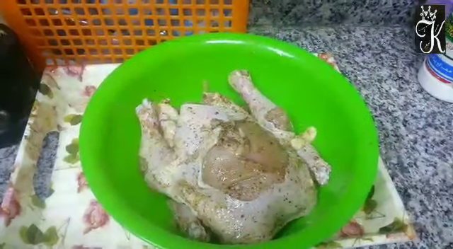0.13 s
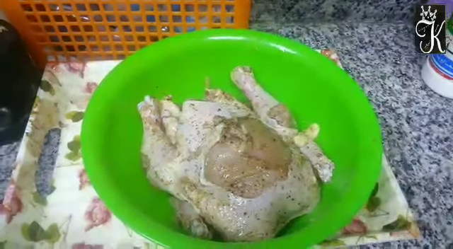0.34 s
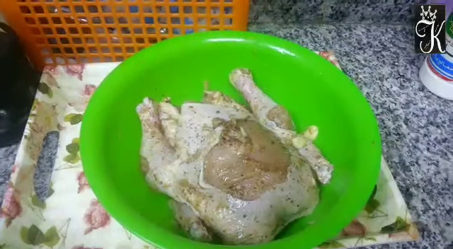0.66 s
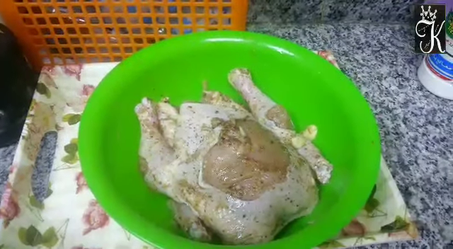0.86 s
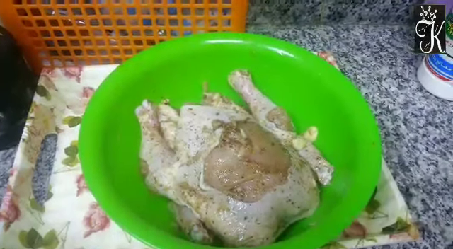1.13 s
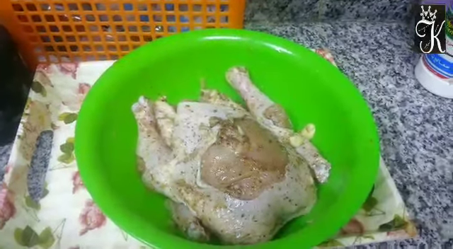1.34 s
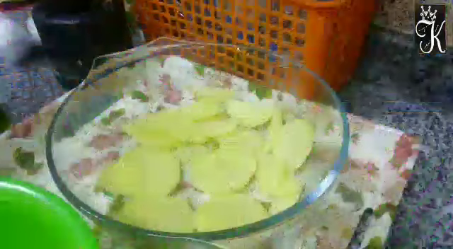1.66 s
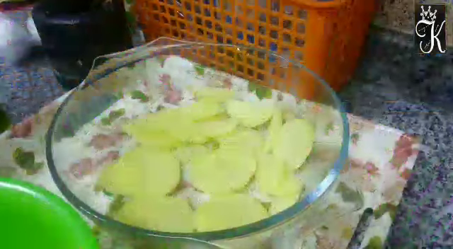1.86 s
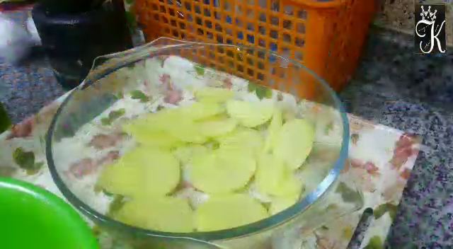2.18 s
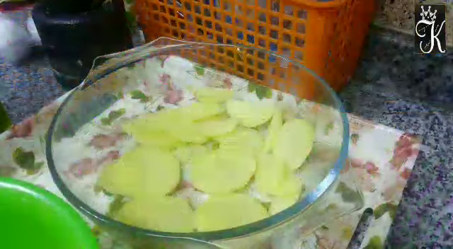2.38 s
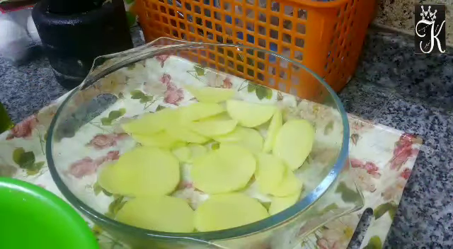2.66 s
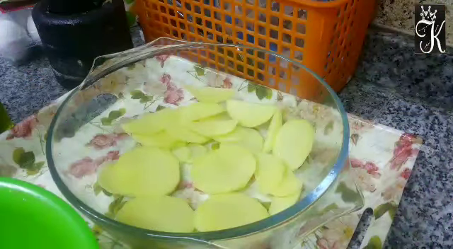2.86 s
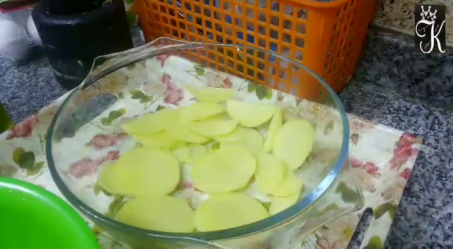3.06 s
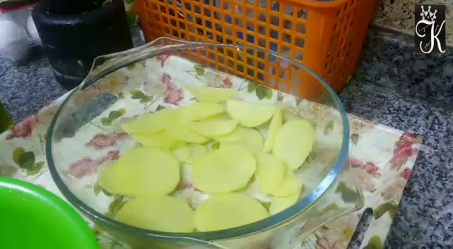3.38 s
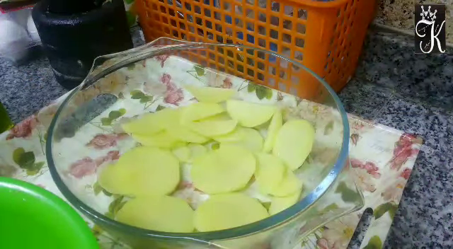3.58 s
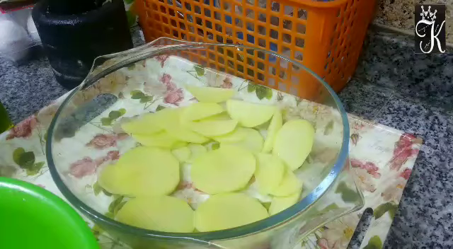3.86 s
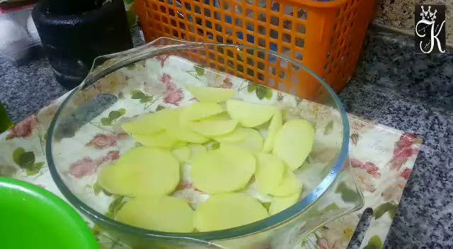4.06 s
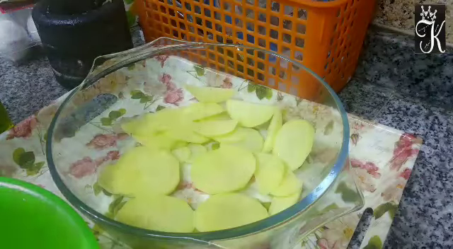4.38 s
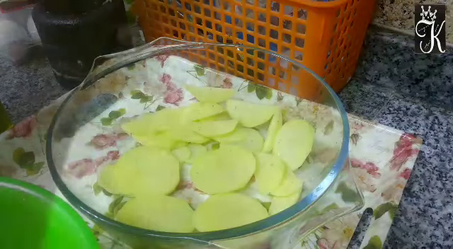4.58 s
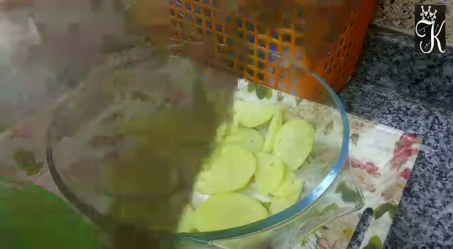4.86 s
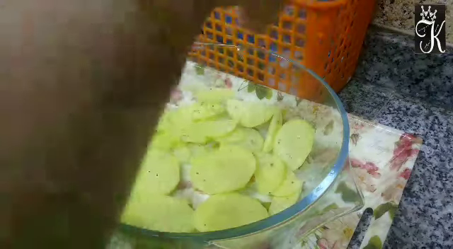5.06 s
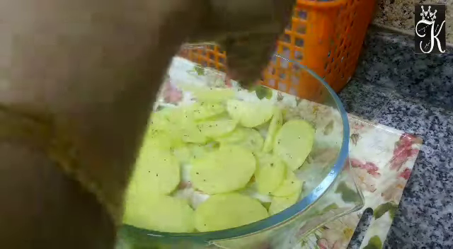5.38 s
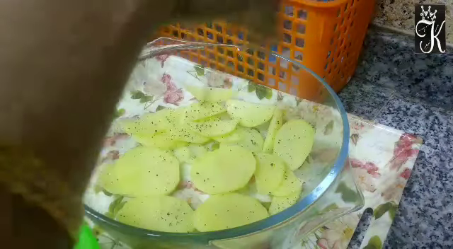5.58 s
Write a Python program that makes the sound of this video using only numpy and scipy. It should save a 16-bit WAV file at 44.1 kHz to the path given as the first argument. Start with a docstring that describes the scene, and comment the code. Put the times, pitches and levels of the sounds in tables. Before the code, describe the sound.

In a quiet kitchen, a glass baking dish clinks twice, slides and lands on a tray, followed by light ticks and soft gritty sprinkling.

```python
"""Two bright clinks of a glass dish, short slides between and after them, a knock as it is set down on a tray,
light taps and ticks. Faint tings come between the clinks, before the taps and later amid the rustle of sprinkled
seasoning. Air and an appliance hum lie below, shifting in tone at 1.7 s, after two faint clock-like ticks a
second apart. Glass and tray are decaying sine modes; contacts, slides, grains and air are coloured noise;
a small, hard-walled room adds echoes and a short tail."""
import sys
import numpy as np
from scipy import signal
from scipy.fft import rfft, irfft, next_fast_len
from scipy.io import wavfile
from scipy.ndimage import map_coordinates

SR = 44100
rng = np.random.default_rng(int(sys.argv[2]) if len(sys.argv) > 2 else 0)


def persist_wave(psi):
    """Save psi, clipped to +-1, as 16-bit WAV."""
    counts = np.round(np.clip(psi, -1, 1) * 32767).astype(np.int16)
    wavfile.write(sys.argv[1], SR, np.atleast_2d(counts).T)


N = 252252

# Room decay. Each row: frequency in Hz, t60 in seconds.
ROOM_DECAY = [(150, 0.45), (1000, 0.38), (3000, 0.4), (7000, 0.37), (14000, 0.13)]

# Air spectrum before and after the shift. Each row: frequency in Hz, relative level in dB.
AIR_EARLY_SPECTRUM = [(25, -44), (64, -21.5), (105, -5), (170, -8.5), (260, -7.5), (400, -10), (570, -13),
                      (1140, -19.5), (2000, -23.5), (4400, -27.5), (6500, -31), (12000, -28), (15500, -34)]
AIR_LATE_SPECTRUM = [(15, -53.5), (25, -31.5), (53, -24.5), (107, -19.5), (169, -4.5), (221, -14),
                     (281, -5.5), (349, -15), (598, -16), (722, -16.5), (1110, -24.5), (1490, -21.5),
                     (2010, -25.5), (12500, -31), (15500, -40.5)]
# Appliance hum. Each row: frequency in Hz, width in Hz, level before the shift in dB, level after it in dB.
HUM_TONES = [(123.5, 24, -70, -81.5), (172.6, 14, -65.5, -60.5), (250, 2.7, -71, -75.5),
             (298, 4.4, -67.5, -70.5), (4010, 28, -78.5, -100)]
SHIFT_START_S, SHIFT_LENGTH_S = 1.7, 0.017
AIR_EARLY_DB, AIR_LATE_DB = -60.5, -60.0

# Clock tick spectrum. Each row: frequency in Hz, relative level in dB.
CLOCK_SPECTRUM = [(500, -12), (1200, 5), (2300, -11), (3700, -1.5), (6000, -10), (12000, -23)]
CLOCK_START_S, CLOCK_DB, CLOCK_RISE_S, CLOCK_T60_S = 0.574, -52.5, 0.019, 0.31

# Rubs of seasoning between the fingers. Each row: start in seconds, length in seconds, level at the end in dB.
RUB_STROKES = [(4.15, 0.017, -63.5), (4.30, 0.027, -59), (4.42, .04, -67), (4.575, .03, -62),
               (4.65, .035, -61.5), (4.72, 0.029, -61), (4.88, 0.093, -64), (4.99, 0.026, -64),
               (5.07, 0.018, -61), (5.11, 0.024, -60.5), (5.28, 0.02, -69), (5.53, .03, -68)]
# Grain spectrum. Each row: frequency in Hz, relative level in dB.
GRAIN_SPECTRUM = [(800, -4.5), (2500, -3), (4200, 3.5), (4900, -1.5), (5150, 6), (5500, -2), (8000, -5),
                  (13000, -6), (15500, -13)]
RUB_SWELL_DB, RUB_RELEASE_T60_S = 6.5, 0.26
STROKE_ATTACK_S = 0.01  # onset of a rub or push

# Grazes of the glass. Each row: start in seconds, level before the room in dB, pitch in Hz.
TING_EVENTS = [(2.333, -45, 6540), (3.416, -59.5, 3940), (4.308, -50, 5120), (4.735, -61, 5170),
               (5.075, -58, 5120)]
TING_RISE_S, TING_T60_S, TING_GRAZE_DB = 0.015, 0.19, -6

# Small contacts. Each row: start in seconds, level before the room in dB, resonance in Hz.
TICK_EVENTS = [(2.835, -45, 7000), (3.189, -47.5, 8000), (3.2303, -39, 8260), (3.2565, -38, 7000),
               (3.264, -47.5, 4470), (3.7945, -52, 4550), (3.818, -50, 4400), (4.1997, -55.5, 3990),
               (4.242, -55, 2980), (4.352, -55.5, 3570), (4.4391, -46.5, 4400), (4.915, -54, 4970),
               (5.162, -56.5, 2570), (5.197, -53, 4500), (5.485, -58, 4700)]
# Tick spectrum. Each row: frequency in Hz, relative level in dB.
TICK_SPECTRUM = [(100, -31), (300, -9), (1500, -7.5), (3000, 0), (3700, -4.5), (4400, 1), (5800, -8.5),
                 (7200, -7.5), (8400, -9), (9200, -5.5), (13000, -13), (15500, -19.5)]
TICK_T60_S, TICK_RING_DB, TICK_ROOM_DB = 0.021, -4, -2

# Pushes of the dish along the tray. Each row: start in seconds, length in seconds,
# level at the end before the room in dB.
PUSH_STROKES = [(2.26, 0.029, -52), (2.46, 0.12, -52.5), (2.78, 0.12, -37.5)]
# Slide spectrum. Each row: frequency in Hz, relative level in dB.
SLIDE_SPECTRUM = [(300, -33.5), (580, -14.5), (720, 2.5), (850, -4.5), (1030, 1.5), (1300, -2.5),
                  (1620, -9.5), (1950, -23.5), (2600, -15.5), (5000, -39), (9000, -65)]
PUSH_SWELL_DB, PUSH_RELEASE_T60_S = 20.5, 0.68

# Contacts of dish and tray. Each row: start in seconds, level of ring and crack in dB, level of the low thump in dB.
KNOCK_EVENTS = [(2.889, -33, -52), (2.938, -16, -37.5), (2.942, -14.5, -35), (2.948, -17, -46),
                (2.959, -36, -49), (2.979, -19.5, -45), (3.469, -45, -79), (3.5929, -27.5, -67),
                (3.598, -33, -68.5), (3.608, -43.5, -64)]
# Tray resonances. Each row: frequency in Hz, width in Hz, relative level in dB.
TRAY_MODES = [(710, 56, -10.5), (885, 57, -10.5), (1070, 57, -5.5), (1298, 64, 1), (1334, 41, -2),
              (1574, 46, -3), (1890, 79, -10), (2026, 63, -13), (2402, 69, -12), (2810, 130, 0.5),
              (3580, 150, -20.5), (4190, 130, -22.5), (6650, 180, -32)]
# Spectra of the crack and the thump. Each row: frequency in Hz, relative level in dB.
CRACK_SPECTRUM = [(60, -33), (200, -4.5), (500, -9), (750, -15), (1300, 1), (2000, -5.5), (2900, -7),
                  (3400, -9.5), (5500, -24.5), (7000, -20.5), (10000, -35.5), (13000, -52.5)]
THUMP_SPECTRUM = [(25, -27.5), (70, -18.5), (190, 0.5), (300, -2.5), (450, -4.5), (900, -29.5)]
TRAY_MAIN_HZ, TRAY_DB = 1390, -4
# Softness: dB lost per octave away from TRAY_MAIN_HZ; zero at HARD_DB, more for weaker contacts.
HARD_DB, SOFTNESS_PER_DB, SOFTEST_DB = -19, 1.33, 8.5
# Levels of a contact at HARD_DB, and the dB each loses per dB of softness.
CRACK_DB, CRACK_LOSS = -3.5, 0.78
KNOCK_ROOM_DB, ROOM_LOSS = -3.5, 0.26

# Modes of the glass dish. Each row: frequency in Hz, relative level struck at the rim in dB,
# relative level struck at the side in dB, t60 in seconds while undamped.
GLASS_MODES = [(2442, -11.5, 0, .45), (2885, -4.5, 0, .43), (3267, 0, -15, .22), (4783, -6, -29, .28),
               (3647, -22, -30, .22), (3826, -19, -22, .3), (3860, -17, -30, .22), (4087, -26, -28, .25),
               (4286, -21, -10.5, .35), (5577, -22, -28, .28), (5933, -19, -14, .27), (6692, -25, -15, .26),
               (10100, -35, -20, .2), (10300, -28, -31, .22), (5850, -30, -20, .15), (6143, -28, -34, .2),
               (6305, -34, -24, .2), (7830, -25, -25, .18), (8910, -33, -42, .15), (9648, -29, -42, .2),
               (11007, -30, -46, .14), (11480, -29, -34, .15), (11970, -29, -48, .12),
               (12480, -29, -48, .1)]
# Two clinks, one after a tiny lead-in touch, one with a bounce. Each row: start in seconds, ring level in dB,
# contact noise level in dB, striker level in dB, place from 0 rim to 1 side, seconds until the hand damps it.
CLINK_EVENTS = [(2.0932, -46, -46, -38, 0, .01), (2.0954, -10.5, -19.5, -11, 0, .22),
                (2.5922, -23.5, -28.5, -13.5, 1, .14), (2.6266, -42, -34, -12.5, 1, .03)]
# Contact noise spectrum. Each row: frequency in Hz, relative level in dB.
CONTACT_SPECTRUM = [(40, -42), (150, -20.5), (300, -20.5), (700, -13), (1300, -8.5), (2100, -4.5),
                    (3000, -10), (3800, 1.5), (5200, -14), (6600, -8), (8600, -17), (12500, -19.5),
                    (14000, -48)]
# Short ring of whatever hits the glass: frequency in Hz, t60 in seconds.
STRIKER_MODE = (2963, 0.031)
DAMPING_DB_PER_S = 170

PEAK_LIMIT, BASS_CUT_HZ, TOP_HZ = 0.45, 30, 15600


def gain(db):
    """Decibels to amplitude ratio."""
    return 10 ** (np.asarray(db) / 20)


def unit(x):
    """Scale to rms 1."""
    return x / np.sqrt(np.mean(x ** 2) + 1e-20)


def along(points, hz):
    """Interpolate (Hz, value) points on a log frequency axis."""
    point_hz, values = np.transpose(points)
    return np.interp(np.log(hz + 1), np.log(point_hz + 1), values)


def wobble(rate_hz):
    """Smooth random curve with rate_hz knots a second."""
    knots = rng.standard_normal(int(N * rate_hz / SR) + 4)
    return map_coordinates(knots, [np.arange(N) * rate_hz / SR])


def filtered(x, response):
    """Multiply the spectrum of x by a response of frequency."""
    size = next_fast_len(len(x) + 8192)
    hz = np.fft.rfftfreq(size, 1 / SR)
    return irfft(rfft(x, size) * response(hz), size)[:len(x)]


def coloured(x, spectrum, tilt_db=0, size=4096):
    """Minimum-phase filter of unit energy; tilt_db approaches dB per octave well above 500 Hz."""
    hz = np.fft.rfftfreq(size, 1 / SR)
    level_db = along(spectrum, hz) + tilt_db * np.log2(1 + hz / 500)
    # Folding the cepstrum onto positive time makes the filter causal.
    cepstrum = irfft(np.log(gain(level_db)))
    cepstrum[1:size // 2] *= 2
    cepstrum[size // 2 + 1:] = 0
    kernel = irfft(np.exp(rfft(cepstrum)))
    return signal.fftconvolve(x, kernel / np.linalg.norm(kernel))[:len(x)]


def resonant(x, hz, width_hz):
    """Pass x through one narrow resonance at equal rms."""
    b, a = signal.iirpeak(hz, hz / width_hz, SR)
    return np.std(x) * unit(signal.lfilter(b, a, x))


def burst(t60_s, rise_s=0.00027):
    """One second of noise that rises, then decays exponentially."""
    t = np.arange(SR) / SR
    return rng.standard_normal(SR) * gain(-60 * t / t60_s) * (1 - np.exp(-t / rise_s))


def ringing(hz, t60_s):
    """One second of a struck mode: a decaying sine of random phase."""
    t = np.arange(SR) / SR
    attack = 1 - np.exp(-(t / 0.0006) ** 2)
    return np.sin(2 * np.pi * (hz * t + rng.random())) * gain(-60 * t / t60_s) * attack


def strokes(rows, swell_db, release_t60_s):
    """Envelope of rubbing strokes: each sets in quickly, swells to its end and dies away."""
    t, envelope = np.arange(N) / SR, np.zeros(N)
    for start_s, length_s, end_db in rows:
        attack = np.clip((t - start_s) / STROKE_ATTACK_S, 0, 1)
        to_go = np.clip(1 - (t - start_s) / length_s, 0, 1)
        after_s = np.maximum(t - start_s - length_s, 0)
        level_db = end_db - swell_db * to_go - 60 * after_s / release_t60_s
        envelope = np.maximum(envelope, attack * gain(level_db))
    return envelope


def add(track, start_s, sound):
    """Mix sound into track in place."""
    part = track[round(start_s * SR):][:len(sound)]
    part += sound[:len(part)]


def in_room(x, wet_db, gap_s=0.0036, echo_count=8):
    """Direct sound, a few echoes off near walls, and a tail in which each frequency dies at its own speed."""
    hz, t, noise_stft = signal.stft(rng.standard_normal(SR // 2), SR, nperseg=256)
    decay = gain(-60 * t / along(ROOM_DECAY, hz)[:, None])
    tail = signal.istft(noise_stft * decay, SR, nperseg=256)[1]
    tail *= 1 - np.exp(-(np.arange(len(tail)) / SR / gap_s) ** 2)
    tail /= np.linalg.norm(tail)
    echo_at = (rng.uniform(0.002, 0.025, echo_count) * SR).astype(int)
    tail[echo_at] += 0.24 * rng.choice([-1, 1], echo_count)
    wet = signal.fftconvolve(x, tail / np.linalg.norm(tail))[:len(x)]
    return x + gain(wet_db) * wet


def air(spectrum):
    """Steady room air: coloured noise at rms 1."""
    return unit(coloured(rng.standard_normal(N), spectrum))


def background():
    """Room air plus appliance hum, each hum tone a carrier with random complex modulation."""
    t = np.arange(N) / SR
    late = np.clip((t - SHIFT_START_S) / SHIFT_LENGTH_S, 0, 1)
    out = (1 - late) * gain(AIR_EARLY_DB) * air(AIR_EARLY_SPECTRUM)
    out += late * gain(AIR_LATE_DB) * air(AIR_LATE_SPECTRUM)
    for hz, width_hz, early_db, late_db in HUM_TONES:
        sway = 1 + 0.69 * (wobble(2 * width_hz) + 1j * wobble(2 * width_hz))
        tone = unit(np.real(sway * np.exp(2j * np.pi * hz * t)))
        out += gain(early_db + late * (late_db - early_db)) * tone
    return out


def clock(count=2):
    """Distant ticks a second apart: noise puffs with the slow rise and long decay of room blur."""
    out = np.zeros(N)
    for second in range(count):
        tick = coloured(burst(CLOCK_T60_S, CLOCK_RISE_S), CLOCK_SPECTRUM)
        add(out, CLOCK_START_S + second, gain(CLOCK_DB) * tick)
    return out


def seasoning():
    """Fine grains rub and fall in loose clumps: noise with fast and slow random level."""
    clumping_db = 3.5 * wobble(900) + 2.12 * wobble(35)
    grains = rng.standard_normal(N) * gain(clumping_db)
    envelope = strokes(RUB_STROKES, RUB_SWELL_DB, RUB_RELEASE_T60_S)
    return envelope * unit(coloured(grains, GRAIN_SPECTRUM))


def tings():
    """A graze makes glass sing briefly: one soft note, slightly roughened by the rubbing."""
    out, t = np.zeros(N), np.arange(SR) / SR
    swell = (1 - np.exp(-t / TING_RISE_S)) * gain(-60 * t / TING_T60_S)
    for start_s, db, hz in TING_EVENTS:
        graze = gain(TING_GRAZE_DB) * resonant(rng.standard_normal(SR), hz, width_hz=460)
        note = swell * (np.sin(2 * np.pi * hz * t) + graze)
        add(out, start_s, gain(db) * in_room(note, wet_db=-3))
    return out


def ticks(width_hz=250):
    """Small contacts of things being handled: noise puffs, each with one narrow resonance."""
    out = np.zeros(N)
    for start_s, db, hz in TICK_EVENTS:
        puff = coloured(burst(TICK_T60_S), TICK_SPECTRUM)
        tick = puff + gain(TICK_RING_DB) * resonant(puff, hz, width_hz)
        add(out, start_s, gain(db) * in_room(tick, TICK_ROOM_DB))
    return out


def slide():
    """The base catches and slips on the tray, harder just before it lands: noise of jittering level."""
    slips = rng.standard_normal(N) * gain(3.1 * wobble(140))
    envelope = strokes(PUSH_STROKES, PUSH_SWELL_DB, PUSH_RELEASE_T60_S)
    return in_room(envelope * unit(coloured(slips, SLIDE_SPECTRUM)), wet_db=-5.5)


def tray_ring(soft_db):
    """Sum of tray modes; a soft contact favours those near the main resonance."""
    ring = np.zeros(SR)
    for hz, width_hz, level_db in TRAY_MODES:
        loss_db = soft_db * abs(np.log2(hz / TRAY_MAIN_HZ))
        t60_s = np.log(1000) / (np.pi * width_hz)
        ring += gain(level_db - loss_db + rng.normal(0, 1)) * ringing(hz, t60_s)
    return ring


def knocks():
    """The dish lands in several quick contacts, each a tray ring, a crack and a low thump."""
    out = np.zeros(N)
    for start_s, db, thump_db in KNOCK_EVENTS:
        soft_db = min(SOFTNESS_PER_DB * (HARD_DB - db), SOFTEST_DB)
        ring = gain(TRAY_DB) * tray_ring(soft_db)
        crack = gain(CRACK_DB - CRACK_LOSS * soft_db) * coloured(burst(t60_s=0.018), CRACK_SPECTRUM)
        thump = gain(thump_db) * coloured(burst(t60_s=0.05), THUMP_SPECTRUM)
        knock = gain(db) * (ring + crack) + thump
        add(out, start_s, in_room(knock, KNOCK_ROOM_DB - ROOM_LOSS * soft_db))
    return out


def clinks():
    """The place of contact sets each mode's strength; the oval dish has twin modes that beat."""
    out, t = np.zeros(N), np.arange(SR) / SR
    for start_s, ring_db, contact_db, striker_db, place, free_s in CLINK_EVENTS:
        grip = gain(-DAMPING_DB_PER_S * np.maximum(t - free_s, 0))
        for hz, rim_db, side_db, t60_s in GLASS_MODES:
            split_hz = rng.uniform(11, 22) * rng.choice([-1, 1])
            mode = ringing(hz, t60_s)
            twin = 0.5 * ringing(hz + split_hz, t60_s)
            heard = in_room(mode + twin, wet_db=-5)
            heard *= np.linalg.norm(mode) / np.linalg.norm(heard)  # energy of the single mode
            mode_db = rim_db + place * (side_db - rim_db)
            add(out, start_s, gain(ring_db + mode_db) * heard * grip)
        crack = coloured(burst(t60_s=0.029), CONTACT_SPECTRUM, tilt_db=-3.5 * place)
        add(out, start_s, gain(contact_db) * in_room(crack, wet_db=2.5))
        add(out, start_s, gain(striker_db) * in_room(ringing(*STRIKER_MODE), wet_db=-9))
    return out


def scene():
    """Sum all sources at one microphone."""
    quiet = background() + clock() + seasoning() + tings() + ticks()
    return (quiet + slide() + knocks() + clinks())[None]


def record(dry):
    """The microphone rounds the highest peaks, thins the deep bass and keeps nothing above its band limit."""
    rounded = dry[0] / (1 + (dry[0] / PEAK_LIMIT) ** 6) ** (1 / 6)
    bass_cut = signal.butter(2, BASS_CUT_HZ, "high", fs=SR, output="sos")
    thinned = signal.sosfilt(bass_cut, rounded)
    return filtered(thinned, lambda hz: hz < TOP_HZ)[None]


dry = scene()
out = record(dry)
persist_wave(out)
```